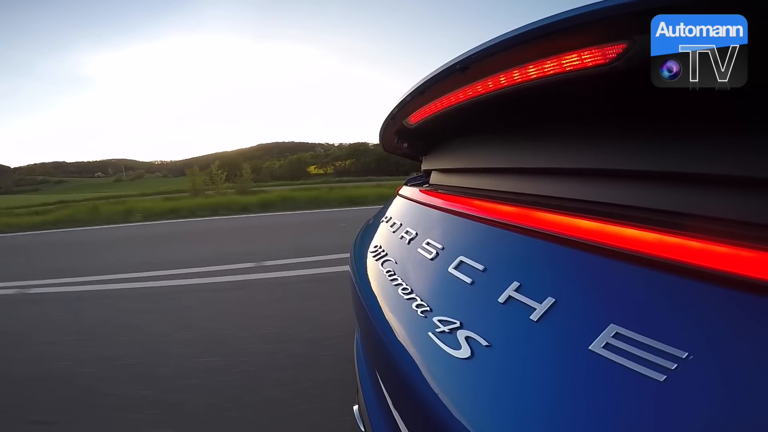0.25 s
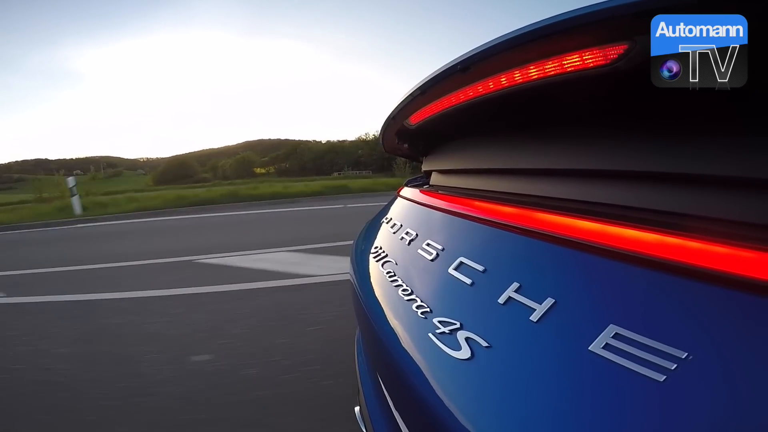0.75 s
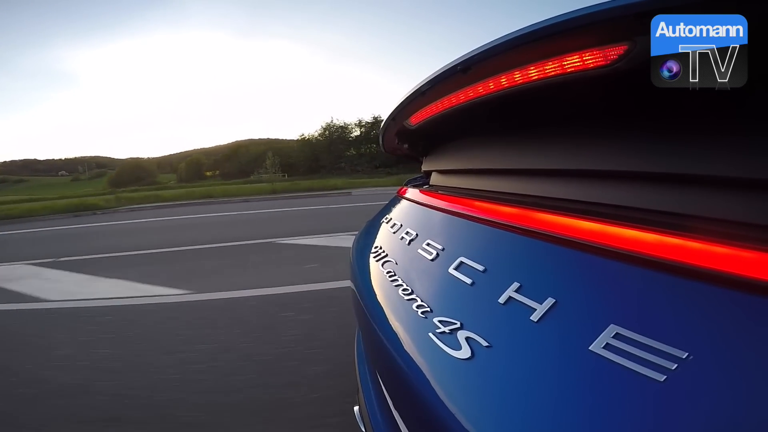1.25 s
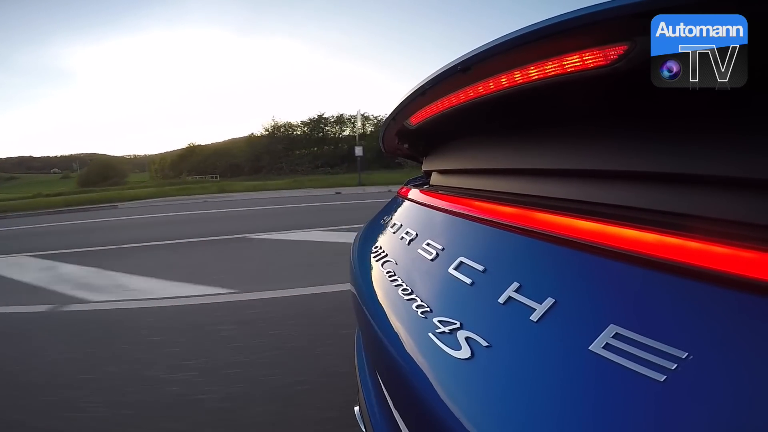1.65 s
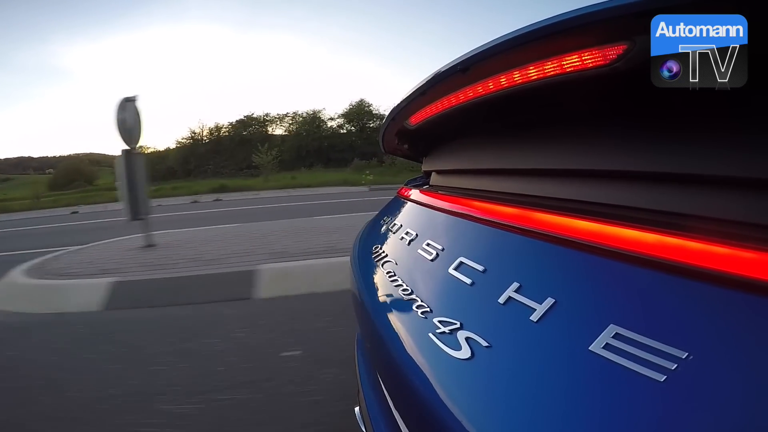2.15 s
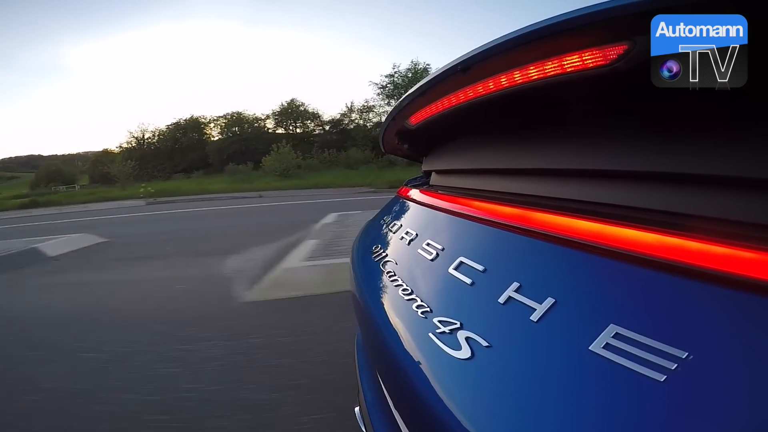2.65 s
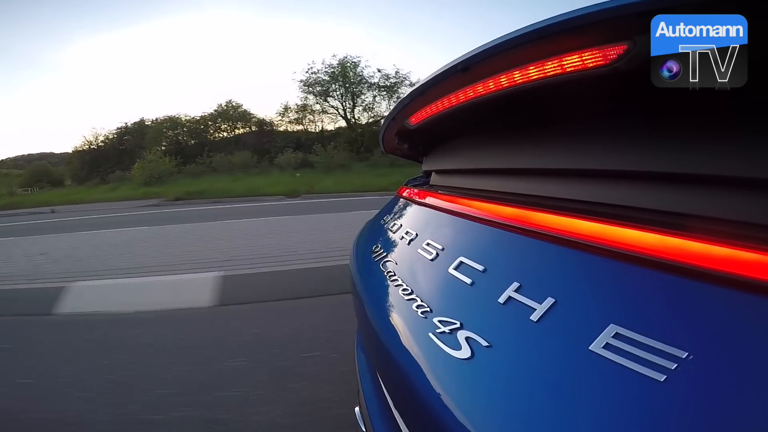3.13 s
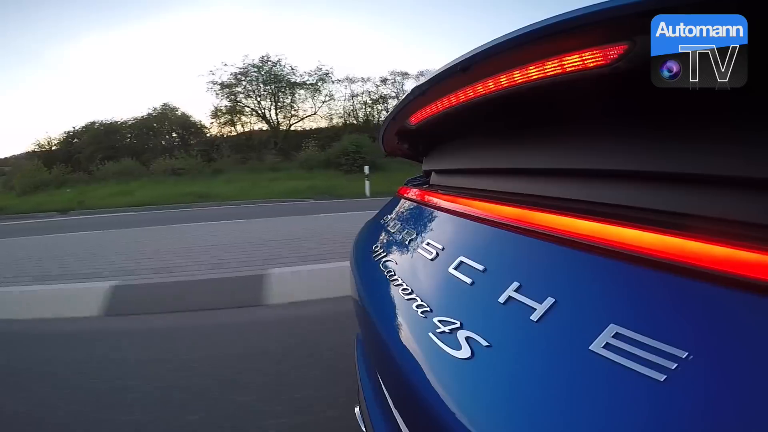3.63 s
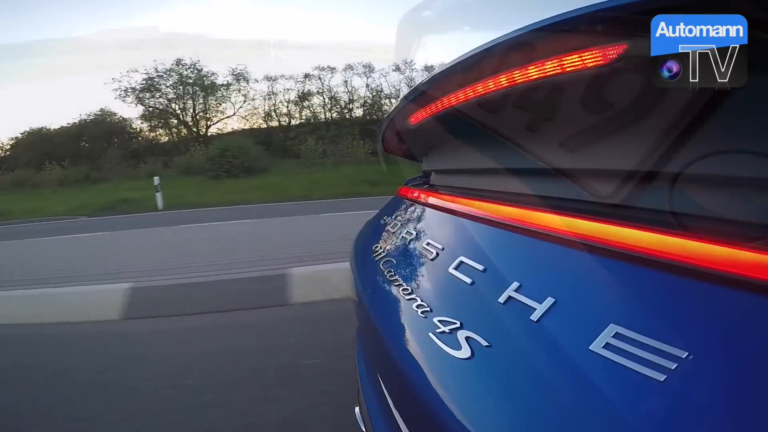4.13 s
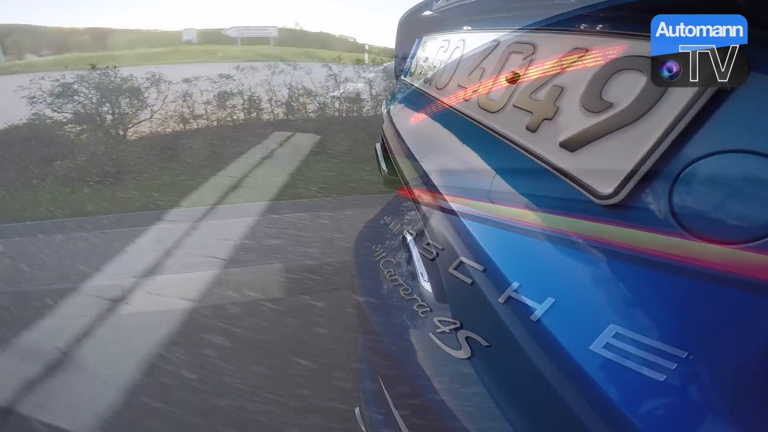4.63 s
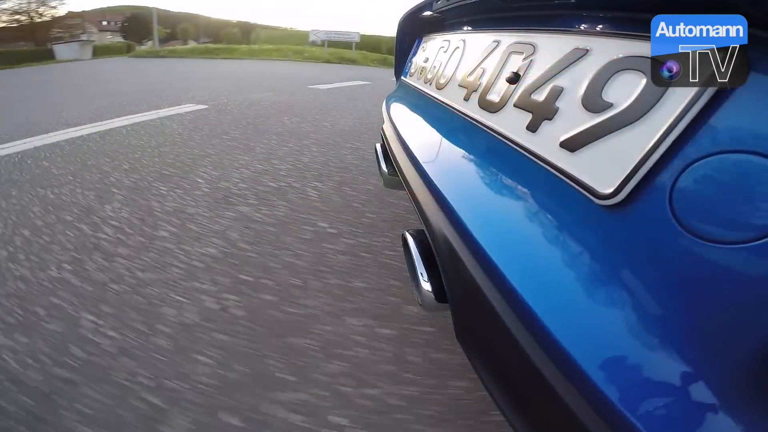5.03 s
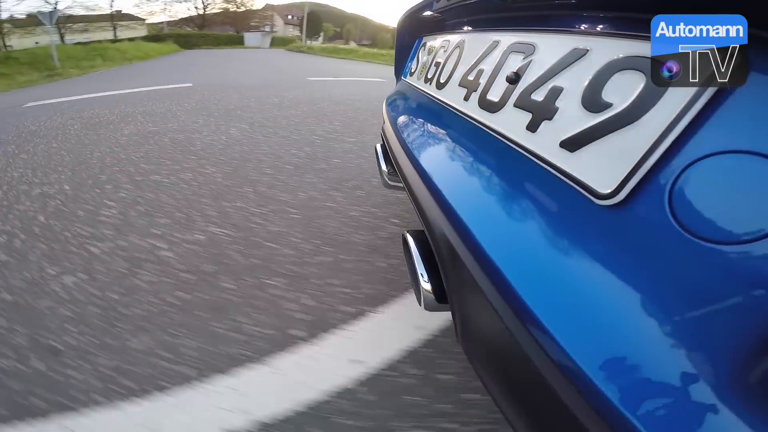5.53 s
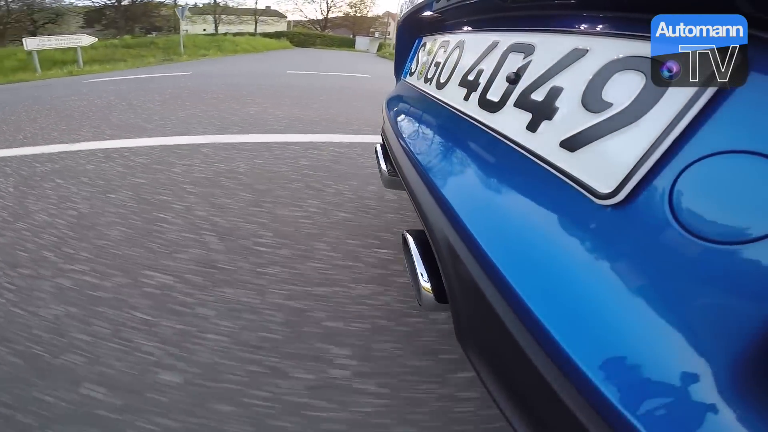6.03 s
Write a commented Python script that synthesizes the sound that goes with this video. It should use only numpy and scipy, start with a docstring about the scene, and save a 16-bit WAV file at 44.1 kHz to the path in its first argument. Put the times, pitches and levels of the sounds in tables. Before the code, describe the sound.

Heard from its tail, a sports car blips the throttle, pops and crackles, slows with a burble, then accelerates with a deep, throbbing exhaust.

```python
"""A turbocharged flat-six sports car, from a microphone fixed to its tail, out in the wind.
The throttle blips for a downshift. Fuel bursts in the exhaust, and the volley of bangs ducks the
microphone's gain, which creeps back over a long overrun with turbo whistle, gear whine and road hiss.
Then a crossfade to a sheltered spot close beside the tailpipes, where the engine pulls from low revs,
its two cylinder banks puffing in turn."""
import sys
import numpy as np
from scipy import signal
from scipy.fft import rfft, irfft, next_fast_len
from scipy.io import wavfile
from scipy.ndimage import uniform_filter1d

SR = 44100
rng = np.random.default_rng(int(sys.argv[2]) if len(sys.argv) > 2 else 0)


def generate_wav(signal):
    """Clip the signal to [-1, 1] and save it as 16-bit WAV at the path in sys.argv[1]."""
    frames = np.transpose(np.atleast_2d(signal))
    scaled = np.clip(frames, -1, 1) * 32767
    pcm = np.round(scaled).astype(np.int16)
    wavfile.write(sys.argv[1], SR, pcm)


N = 276948
T = np.arange(N) / SR
MID_SPEED = 28  # crank turns per second

# crank speed in the lower gear as the car slows: time_s, turns_per_s
ROAD_SPEED = [(.4, 39.5), (.8, 38.3), (1.24, 36.6), (2.3, 32.22), (2.75, 30.07), (3.6, 24.83),
              (4.45, 19.23)]
# spectrum of loose gas in the tailpipe: frequency_hz, level_db
GAS_SPECTRUM = [(50, -10.5), (90, -17), (170, -9.5), (220, 3), (280, 0.5), (350, -0.5), (425, 4.5),
                (490, -2), (580, -14.5), (720, -24), (830, -23), (1500, -37), (3000, -81)]
# spectrum of the road hiss: frequency_hz, level_db
HISS_SPECTRUM = [(400, -12.5), (700, 3), (860, -2.5), (1100, 2.5), (1300, 0), (1550, -5.5), (1850, -1.5),
                 (2100, -3.5), (3000, -2.5), (3450, -9), (3700, -9), (4150, -7.5), (4650, -11), (5050, -7),
                 (5600, -12.5), (6600, -12), (7900, -25.5), (9800, -26), (15400, -34)]
# exhaust resonances, the first being gas bouncing in the silencer: pitch_hz, level_db, t60_s
EXHAUST_MODES = [(46.45, -3.5, 0.23), (102, -7.5, 0.062), (225, -5, 0.049), (370.5, -1.5, 0.08),
                 (439.3, -1.5, 0.04), (680.5, -9.5, 0.058), (1110, -27, 0.039), (1320, -26, 0.0047)]


def amp(db):
    """Decibels to gain."""
    return 10 ** (np.asarray(db) / 20)


def unit(x):
    """Scales to rms 1."""
    return x / np.sqrt(np.mean(x ** 2) + 1e-20)


def curve(rows):
    """Joins (time_s, value) points by straight lines."""
    return np.interp(T, *np.transpose(rows))


def ramp(start, length):
    """Rises from 0 to 1 in a straight line."""
    return np.clip((T - start) / length, 0, 1)


def spell(start, end, rise, fall):
    """Attack from the start, hold, release from the end."""
    return ramp(start, rise) * (1 - ramp(end, fall))


def lagged(x, seconds):
    """Follows a signal with a time constant."""
    pole = np.exp(-1 / (seconds * SR))
    return signal.lfilter([1 - pole], [1, -pole], x)


def response(spectrum, hz):
    """Gain of a spectrum at given frequencies."""
    points_hz, db = np.transpose(spectrum)
    return amp(np.interp(np.log(hz + 1), np.log(points_hz + 1), db))


def colour(x, spectrum):
    """Filters by a spectrum and scales to rms 1."""
    size = next_fast_len(len(x) + 8192)
    gain = response(spectrum, np.fft.rfftfreq(size, 1 / SR))
    return unit(irfft(rfft(x, size) * gain, size)[:len(x)])


def noise():
    """White noise."""
    return rng.standard_normal(N)


def wander(hz):
    """Smooth random drift of rms 1, up to about the given rate."""
    return unit(irfft(rfft(noise()) * np.exp(-(np.fft.rfftfreq(N, 1 / SR) / hz) ** 2), N))


def pulses(cycles, uneven_db):
    """A click of slightly varying size at every whole cycle."""
    return np.diff(np.floor(cycles), prepend=np.floor(cycles[0])) * amp(uneven_db * noise())


def ring(modes):
    """One dying sine per pipe mode; neighbouring modes leave the pipe with opposite sign."""
    t = np.arange(SR // 3) / SR
    return np.array([(-1) ** (k + 1) * amp(db - 60 * t / t60) * np.sin(2 * np.pi * hz * t)
                     for k, (hz, db, t60) in enumerate(modes)])


def add(mix, start_s, sound):
    """Adds a sound at a time."""
    part = mix[round(start_s * SR):][:len(sound)]
    part += sound[:len(part)]


def by_speed(speed, db, slope_db):
    """Gain of db at MID_SPEED, changing by slope_db per extra turn per second."""
    return amp(db + slope_db * (speed - MID_SPEED))


def crank_speed():
    """Turns per second: swept up by the downshift, then held to the road."""
    high_gear_speed = 28
    shifted = np.sin(np.pi / 2 * ramp(.15, .2)) ** 2
    return high_gear_speed + shifted * (curve(ROAD_SPEED) - high_gear_speed)


def engine_note(speed, turns, throttle):
    """Crank harmonics through the tailpipe, at even loudness; throttle favours the firing orders."""
    # emphasis from uneven cylinders: crank_multiple, lift_db
    order_lift = [(4, 2), (5, -40), (7, -4.5), (8, 5), (9, 6), (10, -5), (11, 8), (12, 0.5), (13, 7.5),
                  (15, 0.5), (18, 6), (19, 3.5), (21, 7), (23, 5.5)]
    # tailpipe colour: frequency_hz, level_db
    pipe_spectrum = [(50, -22), (100, -7.5), (170, -4), (272, -3), (312, -7), (350, -4.5), (420, -0.5),
                     (480, -6.5), (560, -14), (630, -21.5), (730, -9.5), (830, -26.5), (1100, -29),
                     (1500, -27), (3000, -42)]
    lift_db = {round(k): db for k, db in order_lift}
    firing_orders = range(9, 44, 3)
    note = np.zeros(N)
    for k in (4, 5, *range(7, 44)):  # 3 and 6 belong to the drone
        db = lift_db.get(k, 0) + (k in firing_orders) * 9.5 * throttle + 1.5 * wander(22)
        note += amp(db) * response(pipe_spectrum, k * speed) * np.cos(2 * np.pi * (k * turns + rng.random()))
    return note / np.sqrt(uniform_filter1d(note ** 2, size=8192))


def boom(speed, turns, throttle):
    """A low tone at twice the crank speed, lost under throttle and below a low edge."""
    edge_hz = 38.5
    low_cut = 1 + (edge_hz / (2 * speed)) ** 20
    return amp(-11.5 - 34 * throttle) / low_cut * np.cos(2 * np.pi * 2 * turns)


def drone(speed, turns, throttle):
    """The firing tone and its octave sweep through the resonances of the exhaust."""
    # low exhaust response: frequency_hz, level_db
    resonances = [(61, -7), (72, -25.5), (86, -21.5), (108, -15.5), (116, -19), (124, -12.5), (136, -19.5),
                  (170, -17.5), (193, -25), (222, -10), (240, -20.5)]
    tones = sum(response(resonances, k * speed) * np.cos(2 * np.pi * k * turns) for k in (3, 6))
    return amp(throttle) * tones  # 1 dB up in the blip


def road_hiss(firing):
    """Hiss that flutters as the cylinders fire."""
    return colour(noise() * (8.9 + firing) * amp(.81 * wander(25)), HISS_SPECTRUM)


def coughing(turns):
    """One cylinder barks into the pipe and throbs once a turn, weakening through each spell."""
    # spells of coughing: start_s, end_s, bark_db, throb_db
    coughs = [(-.03, 0.107, -28, -3.5), (0.324, 0.54, -1, -6)]
    sag_db_per_s = 23
    bark = ring(EXHAUST_MODES[4:]).sum(0)  # a short cough excites only the upper modes
    barks = signal.oaconvolve(pulses(turns, uneven_db=1), bark)[:N]
    throb = -np.cos(2 * np.pi * turns)
    out = np.zeros(N)
    for start, end, bark_db, throb_db in coughs:
        envelope = spell(start, end, rise=.027, fall=.038) * amp(-sag_db_per_s * (T - start))
        out += envelope * (amp(bark_db) * barks + amp(throb_db) * throb)
    return out


def coasting(speed, throttle):
    """Engine, ragged exhaust gas, road and gears from the tail, through downshift and overrun."""
    turns = np.cumsum(speed * (1 + .002 * wander(25))) / SR + .06
    burble_db = 6 * ramp(4.06, .17)  # the gas burbles up as the revs sink
    note = engine_note(speed, turns, throttle)
    note *= by_speed(speed, -18.5 + 8.5 * throttle + burble_db, slope_db=.13)
    firing = np.exp(-(3 * turns % 1) / .5) * amp(3 * wander(71))  # three firings a turn
    gas = colour(noise() * firing, GAS_SPECTRUM)
    gas *= by_speed(speed, -27.5 + 9 * throttle + burble_db, slope_db=-.98)
    lows = boom(speed, turns, throttle) + drone(speed, turns, throttle)
    rolling = amp(-27 + 5 * throttle) * (gear_whine(speed, turns) + road_hiss(firing))
    return note + gas + lows + coughing(turns) + rolling


def wind(tail_fader):
    """Lumpy air pressure on the microphone: it eases as the car slows, and is weak by the tailpipes."""
    # buffeting: frequency_hz, level_db
    wind_spectrum = [(8, 7), (18, -18), (28, -1.5), (45, -3.5), (65, -7), (100, -21.5), (200, -22),
                     (400, -17), (900, -70)]
    exposed = by_speed(curve(ROAD_SPEED), -13.5, slope_db=.63) * tail_fader ** 2
    sheltered = amp(-33.5) * (1 - tail_fader)
    return (exposed + sheltered) * colour(noise(), wind_spectrum)


def whistle(hz, width_hz=260, flicker_db=1.5):
    """A fuzzy, flickering tone at the turbo's blade rate."""
    phase = 2 * np.pi * np.cumsum(hz) / SR
    tone = wander(width_hz) * np.cos(phase) + wander(width_hz) * np.sin(phase)
    return unit(tone * amp(flicker_db * wander(36)))


def turbo(speed, throttle):
    """The turbo runs away under throttle; on the overrun it spools up, then follows the crank."""
    # surges under throttle: start_s, end_s, from_hz, to_hz, base_level_db
    surges = [(0, .325, 7350, 13000, -54), (4.55, 4.72, 7350, 8770, -48)]
    spool_start_s, spool_s, spool_from_hz = 1.31, .28, 6400
    mid_hz, db_per_octave, growth_s = 9700, -15, .081
    steady_hz = mid_hz + 233 * (speed - MID_SPEED)
    unspooled = np.exp(-np.maximum(T - spool_start_s, 0) / spool_s)
    hz = steady_hz + (spool_from_hz - steady_hz) * unspooled
    gain = amp(-55 + db_per_octave * np.log2(hz / mid_hz))
    out = spell(spool_start_s, 4.53, rise=.043, fall=.05) * gain * whistle(hz)
    for start, end, from_hz, to_hz, db in surges:
        growth = np.expm1(np.clip(T - start, 0, end - start) / growth_s)
        hz = from_hz + (to_hz - from_hz) * growth / growth[-1]
        out += spell(start, end, rise=.013, fall=.0045) * amp(db + 8 * throttle) * whistle(hz)
    return out


def bangs():
    """Each burst is a pressure blast with a short crack of gas at the tip; then the exhaust rings."""
    # fuel bursting in the exhaust: start_s, strength_db, relative_push_db, relative_crack_db
    bursts = [(.139, -1, 1, 0.5), (0.16, -3, -7, -3), (.178, -6, 8, -9), (.211, -8, 7, -24),
              (0.311, -3, -8, 1.5), (0.61, -8, 3, -16), (.671, 7, -9, -2.5), (.683, 2.5, -0.5, -3),
              (0.7, 6.5, -6, -6), (0.738, 12.5, -5.5, -3.5), (0.781, 11.5, 2.5, -7),
              (0.8267, 12, -3.5, -2.5), (0.8443, 10.5, 0, -3), (0.9126, 12, -4, -1), (0.986, 11.5, -8, 0.5),
              (1.004, 3, -15, -21.5), (1.0189, 11, -18, -7), (1.0671, 9.5, 0, -2.5), (1.152, 11.5, 0.5, -4),
              (4.517, -15, 16, -13), (4.533, -12, 14, -20)]
    # gas cracking at the tip: frequency_hz, level_db
    crack_spectrum = [(300, 13), (800, 13.5), (1500, 6), (2000, -1), (2700, 6.5), (3600, -5), (5000, -5.5),
                      (7000, -12.5), (9000, -30), (15000, -59)]
    out, t = np.zeros(N), np.arange(SR // 3) / SR
    blast = 2.1 * (1 - t / .0045) * np.exp(-t / .0045) * (1 - np.exp(-t / .0012))
    crack_envelope = (np.exp(-t / .003) + .25 * np.exp(-t / .011)) * (1 - np.exp(-t / .0002))
    for start, db, push_db, crack_db in bursts:
        heat = 1 + .025 * rng.standard_normal(len(EXHAUST_MODES))  # gas temperature shifts the modes
        modes = [(hz * shift, level, t60) for (hz, level, t60), shift in zip(EXHAUST_MODES, heat)]
        low_push, *pipe = ring(modes)
        crack = colour(rng.standard_normal(len(t)), crack_spectrum) * crack_envelope
        add(out, start, amp(db) * (blast + amp(push_db) * low_push + sum(pipe)))
        add(out, start - .0006, amp(db + crack_db - 10.5) * crack)
    return out


def gear_whine(speed, turns):
    """The gear teeth load up and sing as the wheels drive the engine."""
    # gear tones, before the hiss spectrum colours them: crank_multiple, level_db
    gears = [(42, -15), (78, -13), (84, -10), (126, -12), (165, -9), (168, -14)]
    whine = np.zeros(N)
    for k, db in gears:
        gain = amp(db + 2.8 * wander(18)) * response(HISS_SPECTRUM, k * speed)
        whine += gain * np.cos(2 * np.pi * round(k) * turns + wander(23))
    return whine * ramp(1.2, .8)


def pulling():
    """Beside the tailpipes the banks puff in turn, ring and rasp, growing with the revs."""
    # the crank under load: time_s, turns_per_s
    pull_speed = [(4.6, 22.06), (4.85, 22.75), (5.1, 24.22), (5.35, 24.88), (5.6, 26.41), (5.8, 27.94),
                  (6.05, 29.97), (6.28, 31.67)]
    # one exhaust puff: frequency_hz, level_db
    puff_spectrum = [(20, -25.5), (42, 4), (75, 2.5), (120, -7.5), (165, -2), (210, -18), (280, -16),
                     (400, -26), (800, -62), (3000, -110)]
    # tailpipe resonances: pitch_hz, level_db, t60_s
    tip_modes = [(318, 2.5, 0.052), (383.3, 5.5, 0.052), (665, -10.5, 0.034), (940, -27, 0.069),
                 (1840, -34, .02), (2450, -26.5, 0.046)]
    # rasp at the tip: frequency_hz, level_db
    rasp_spectrum = [(300, -25), (520, -4), (660, -3), (800, -19.5), (960, -1), (1150, -17), (1480, -19),
                     (1820, -13), (2150, -14), (2480, -12.5), (3300, -19.5), (3600, -24.5), (4000, -19),
                     (4700, -23), (5150, -18.5), (5850, -30.5), (6300, -27), (7200, -30), (8300, -43),
                     (13000, -40.5), (15400, -53.5)]
    speed = curve(pull_speed)
    cycles = np.cumsum(speed * 3 / 2) / SR - .53  # a bank fires three times in two turns
    lag = .5434  # the far bank's puff comes a little over half a cycle later
    puffs = pulses(cycles, uneven_db=.5) + pulses(cycles - lag, uneven_db=.5)
    thud = by_speed(speed, -9, slope_db=.24) * colour(puffs, puff_spectrum)
    front = cycles + .04  # the valve's sharp front runs ahead of the puff
    # the near bank leads in both ring and rasp
    strikes = pulses(front, uneven_db=.8) + .25 * pulses(front - lag, uneven_db=.8)
    pipe = unit(signal.oaconvolve(strikes, -ring(tip_modes).sum(0))[:N])
    flow = .55 + np.exp(-(front % 1) / .13) + .35 * np.exp(-((front - lag) % 1) / .13)
    rasp = colour(noise() * flow * amp(.61 * wander(55)), rasp_spectrum)
    rasp *= by_speed(speed, -35.5, slope_db=.72)
    gas = amp(-11) * colour(noise() * np.sqrt(flow), GAS_SPECTRUM)
    return thud + rasp + by_speed(speed, -24, slope_db=1) * (pipe + gas)


def bypass_sigh():
    """The turbo lets off one short breath of air as the throttle opens again."""
    # bypass air: frequency_hz, level_db
    air_spectrum = [(1500, -18), (5000, 9), (7000, 3), (9000, -7), (15000, -10)]
    return spell(4.45, 4.53, rise=.031, fall=.03) * amp(-33) * colour(noise(), air_spectrum)


def scene():
    """Mono: the spot on the tail crossfades into the spot beside the tailpipes."""
    speed = crank_speed()
    throttle = spell(.17, .311, rise=.075, fall=.041)  # the downshift blip
    tail_fader = (1 - ramp(4.095, .72)) ** .75
    pipe_fader = ramp(4.35, .43)
    tail = coasting(speed, throttle) + turbo(speed, throttle) + bypass_sigh()
    return (tail * tail_fader + bangs() + pulling() * pipe_fader + wind(tail_fader))[None]


def record(dry):
    """Gain control ducks under the bangs and creeps back; missed peaks saturate; then the band limit."""
    threshold_db, recover_db_per_s, sense_s, duck_s = -7.5, 7, .049, .035
    opening_duck_db = 5.5  # the microphone starts already turned down, then creeps back up
    knee_sharpness, cutoff_hz = 8, 15500
    over_db = 10 * np.log10(lagged(dry[0] ** 2, sense_s) + 1e-12) - threshold_db
    recovery_db = recover_db_per_s * T
    peak_db = np.maximum.accumulate(np.maximum(over_db + recovery_db, opening_duck_db))
    held_db = np.maximum(peak_db - recovery_db, 0)
    ducked = dry / amp(opening_duck_db + lagged(held_db - opening_duck_db, duck_s))
    saturated = ducked / (1 + abs(ducked) ** knee_sharpness) ** (1 / knee_sharpness)
    lowpass = signal.firwin(511, cutoff_hz, window=("kaiser", 9), fs=SR)
    return signal.oaconvolve(saturated, lowpass[None], "same")


dry = scene()
out = record(dry)
generate_wav(out)
```